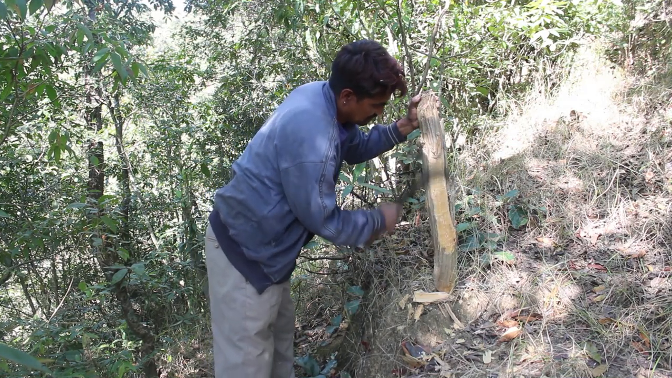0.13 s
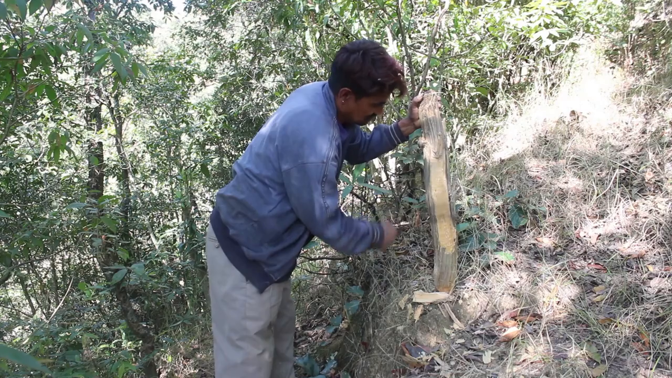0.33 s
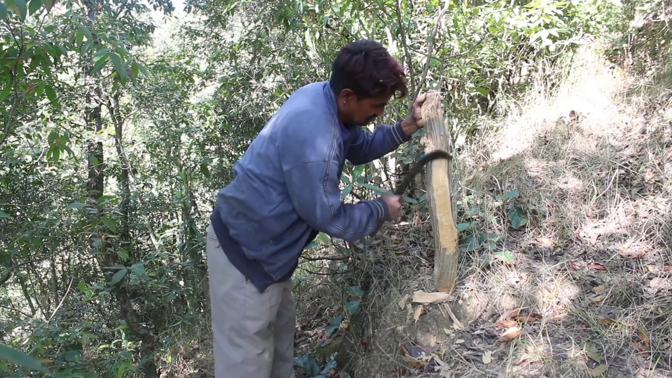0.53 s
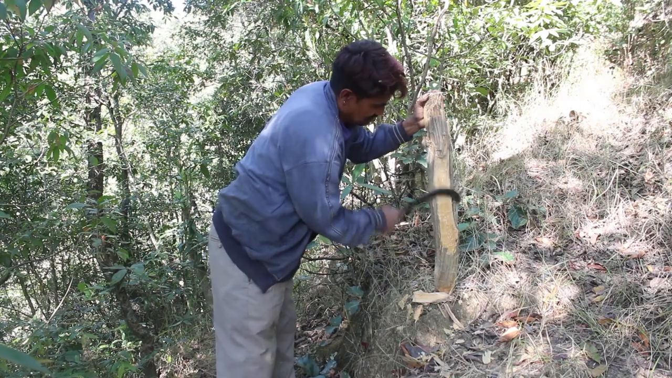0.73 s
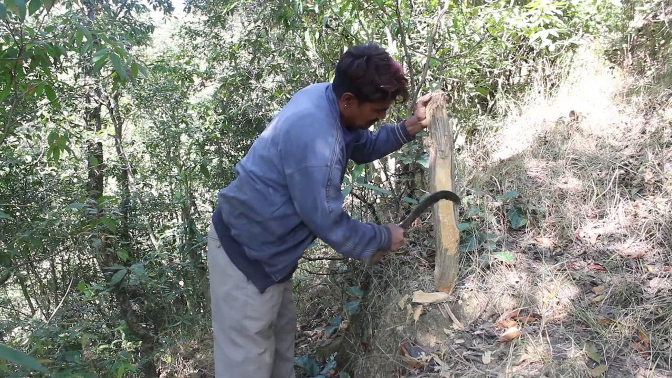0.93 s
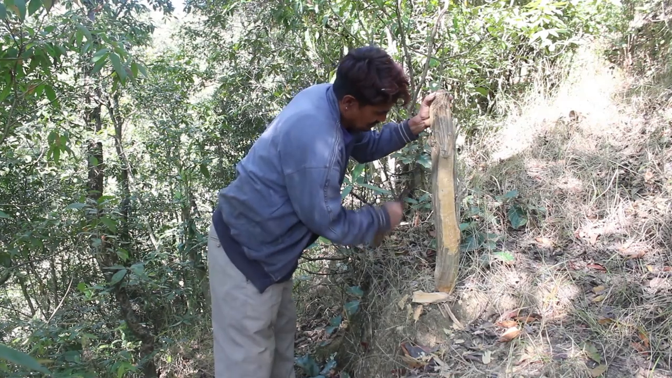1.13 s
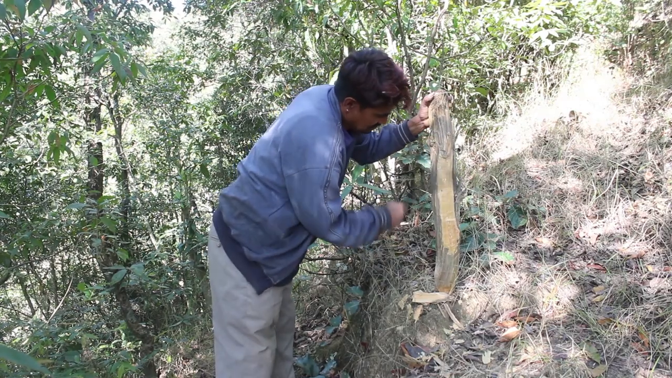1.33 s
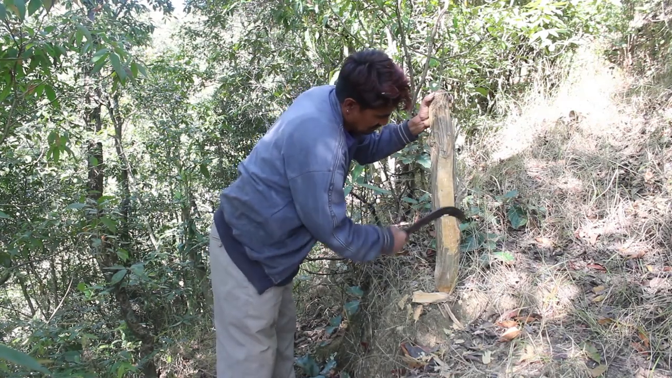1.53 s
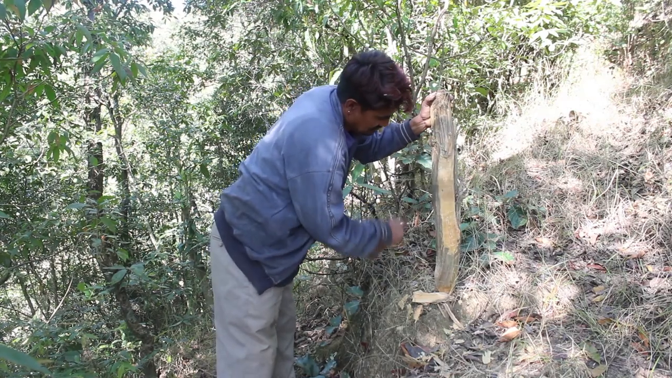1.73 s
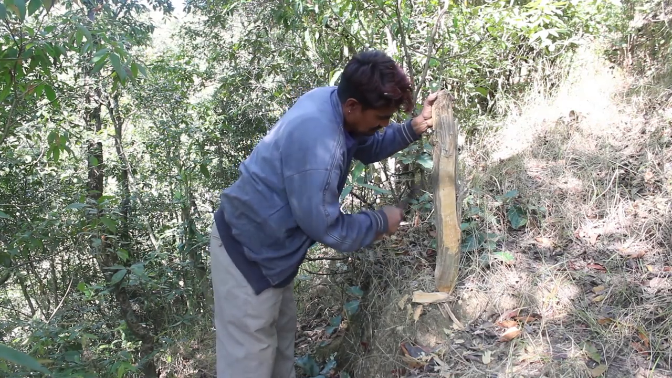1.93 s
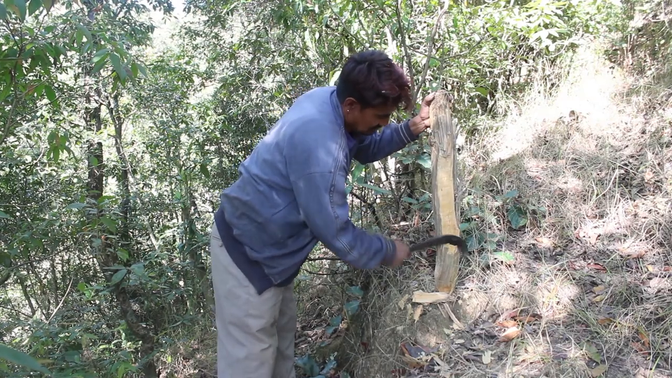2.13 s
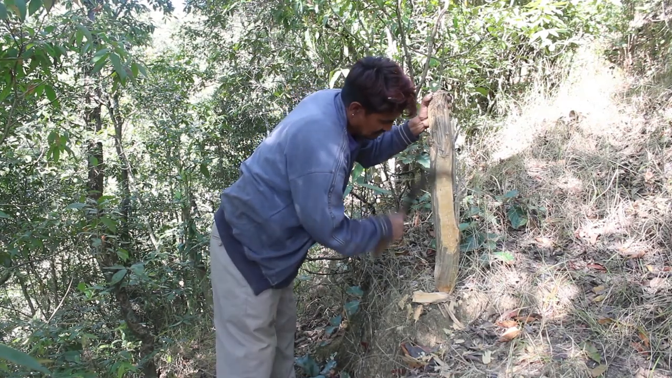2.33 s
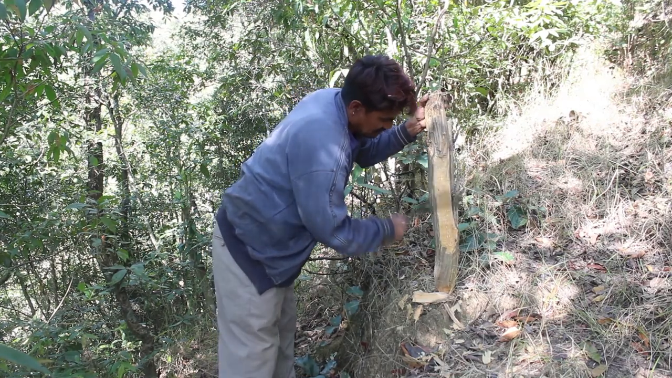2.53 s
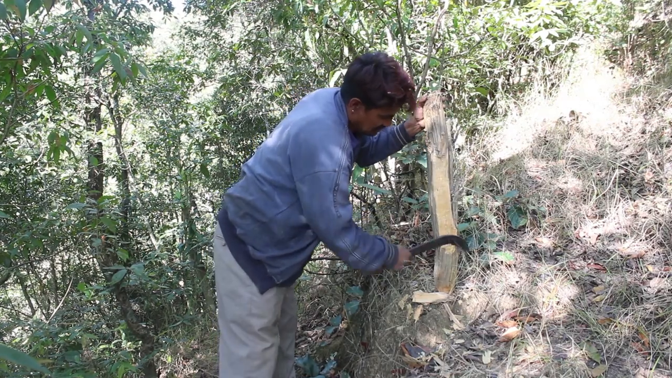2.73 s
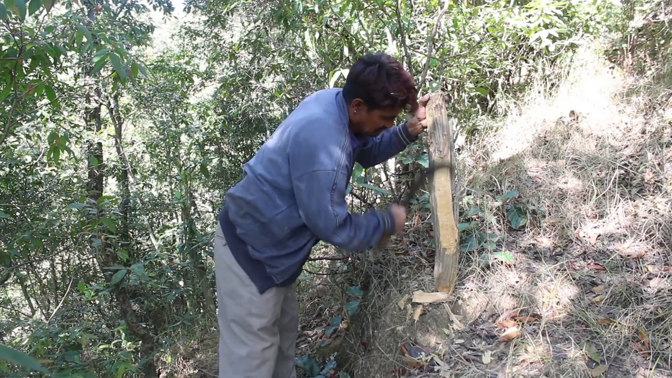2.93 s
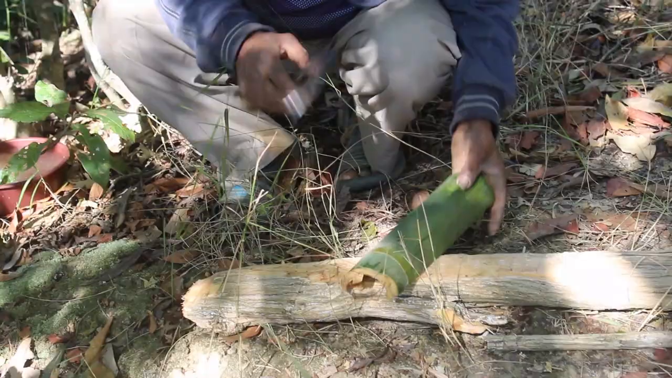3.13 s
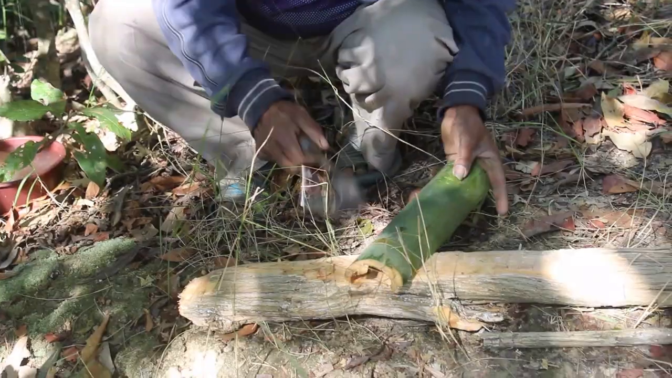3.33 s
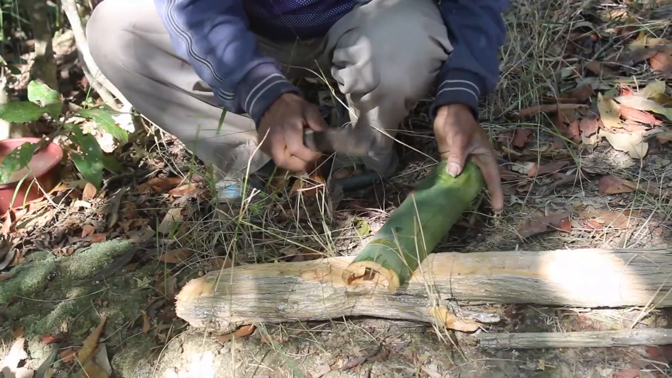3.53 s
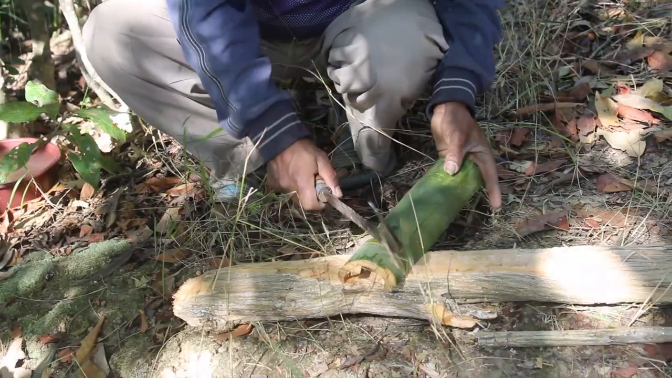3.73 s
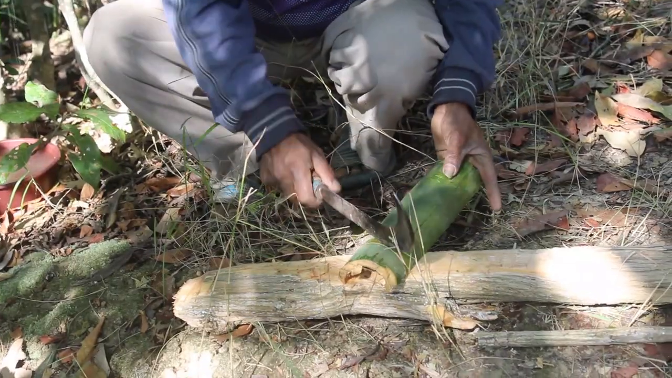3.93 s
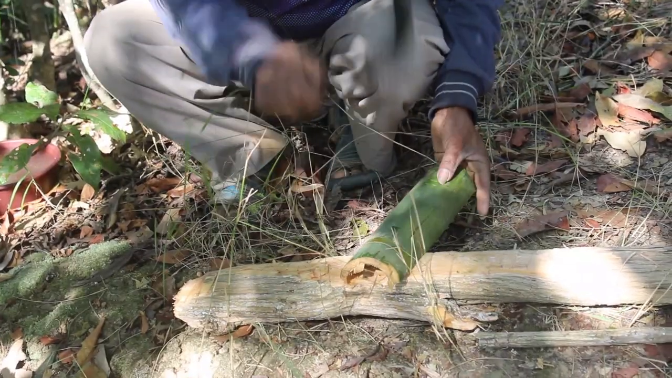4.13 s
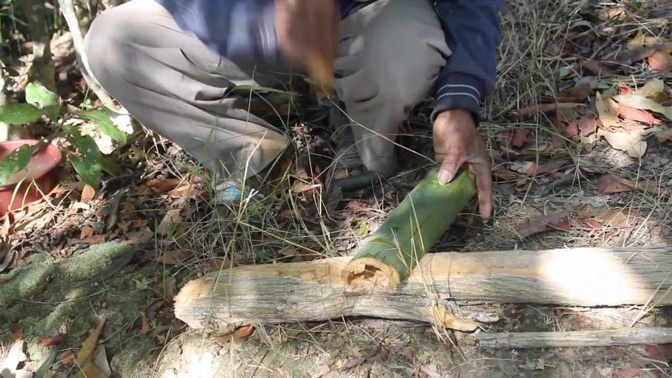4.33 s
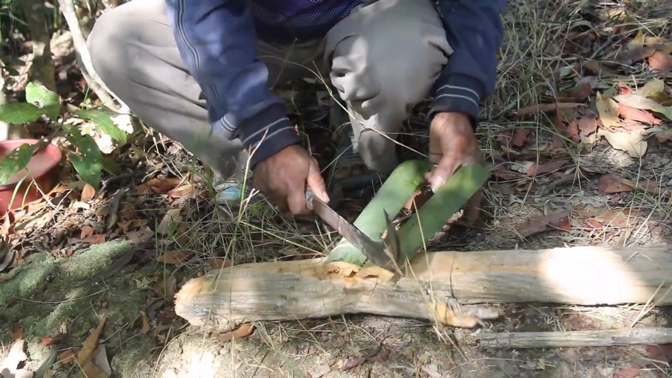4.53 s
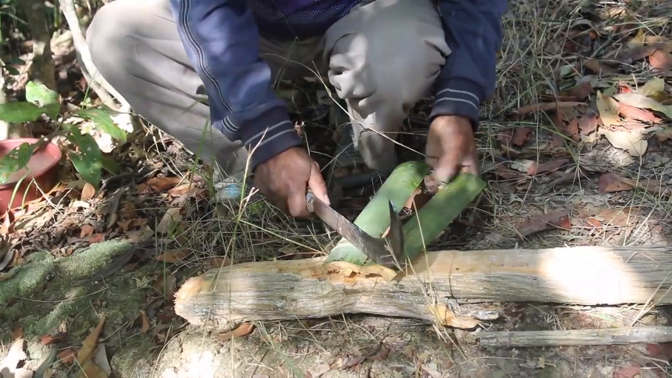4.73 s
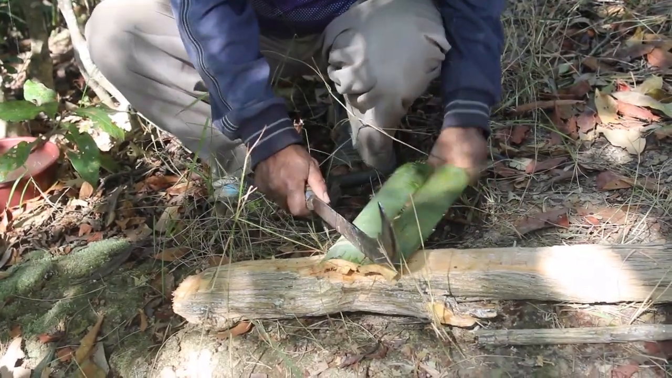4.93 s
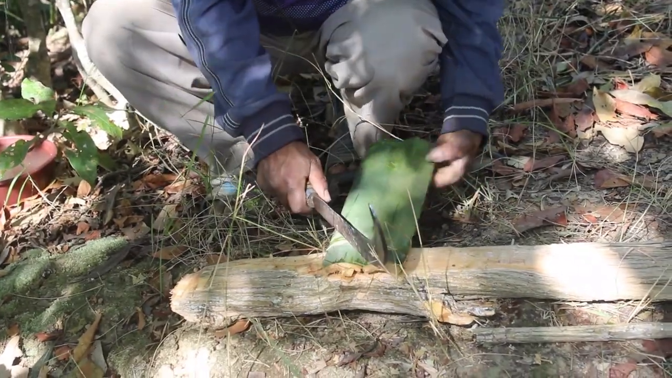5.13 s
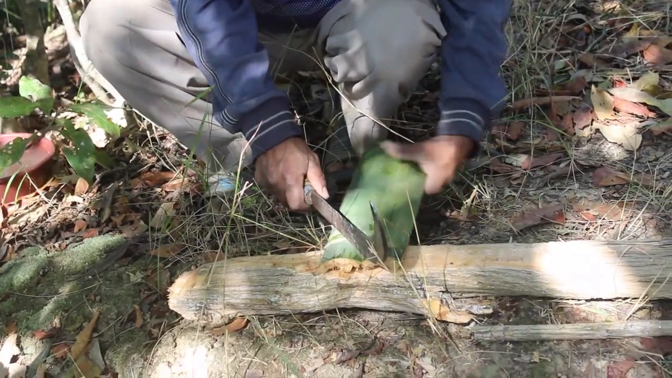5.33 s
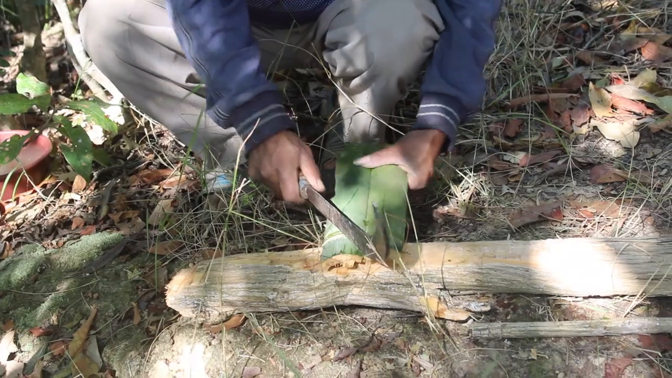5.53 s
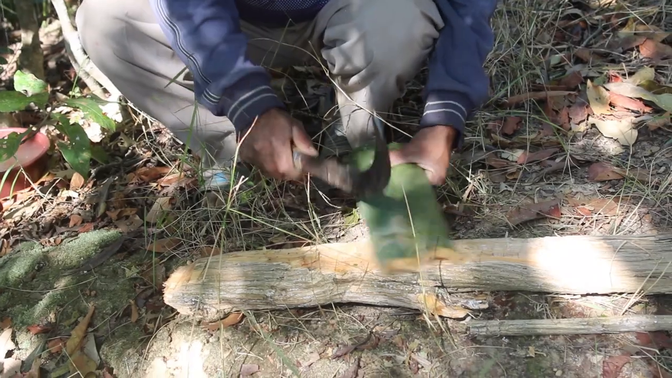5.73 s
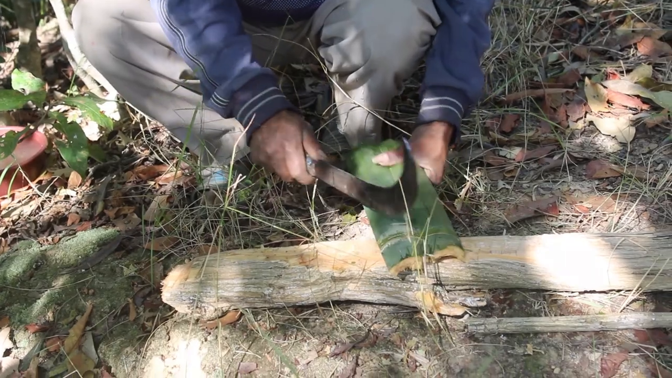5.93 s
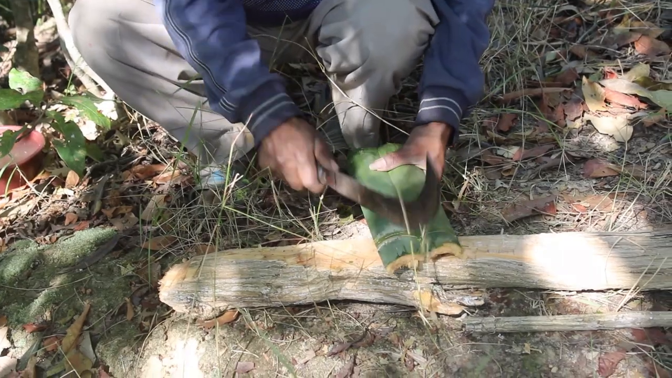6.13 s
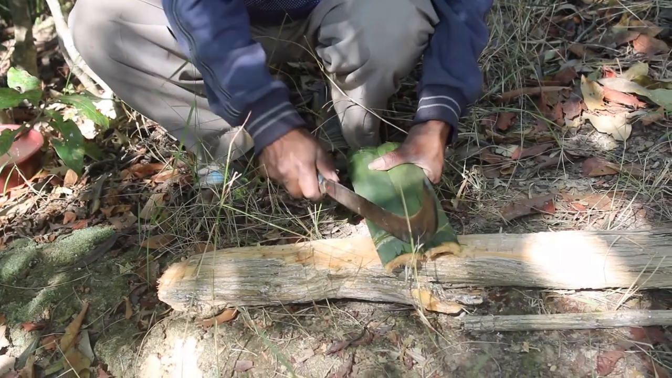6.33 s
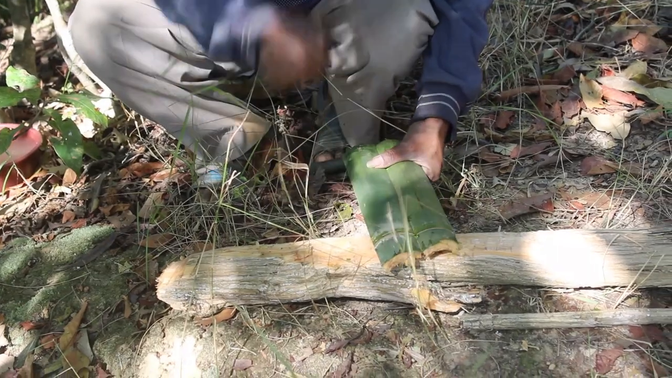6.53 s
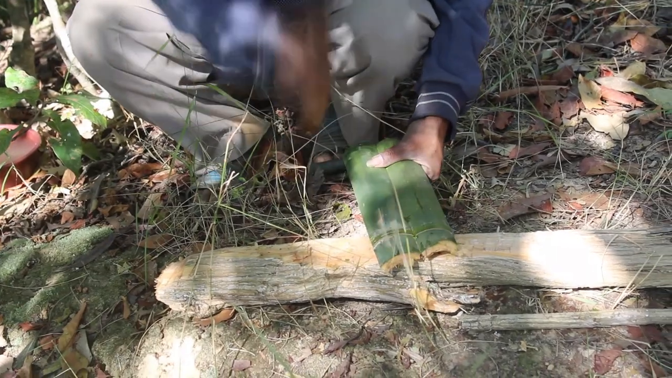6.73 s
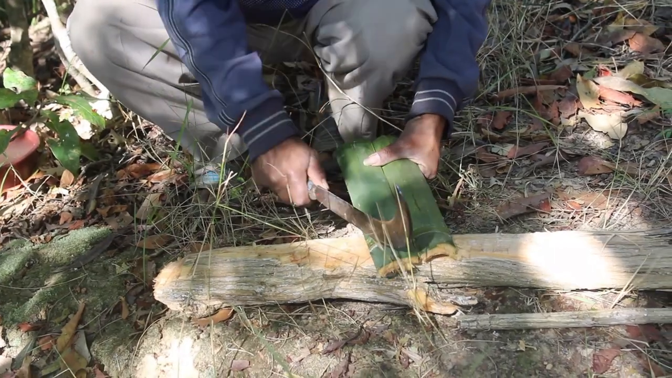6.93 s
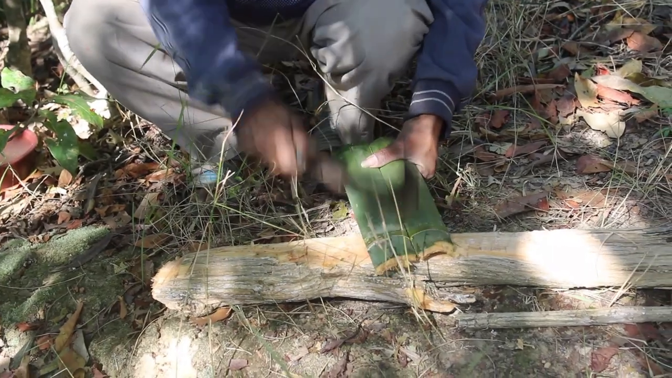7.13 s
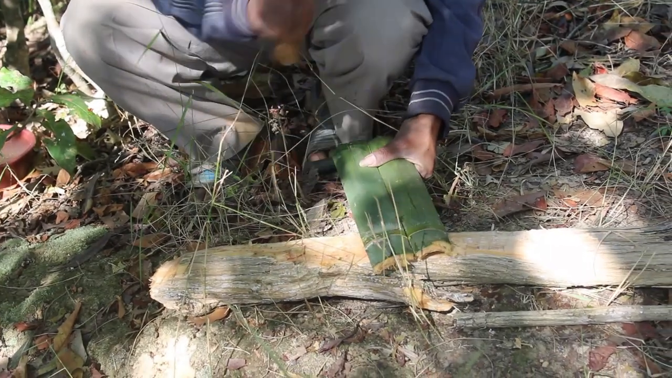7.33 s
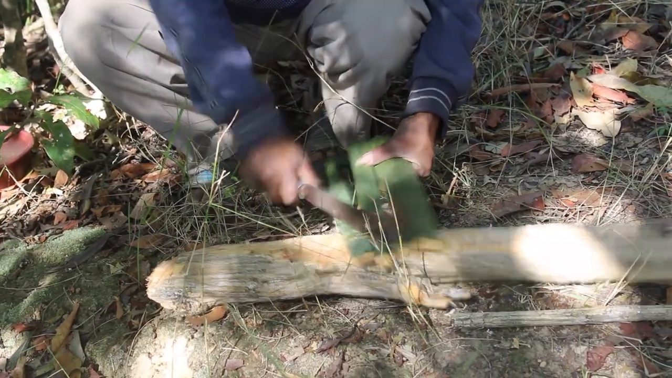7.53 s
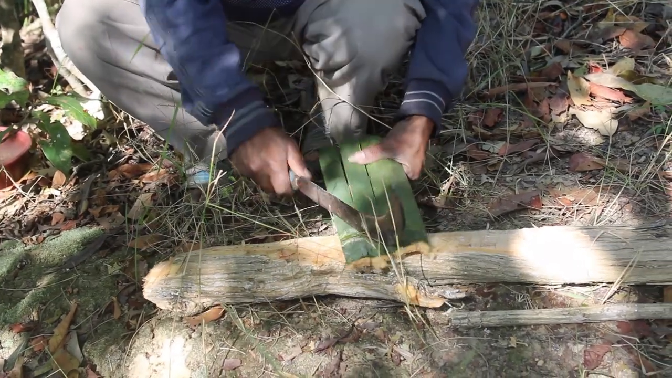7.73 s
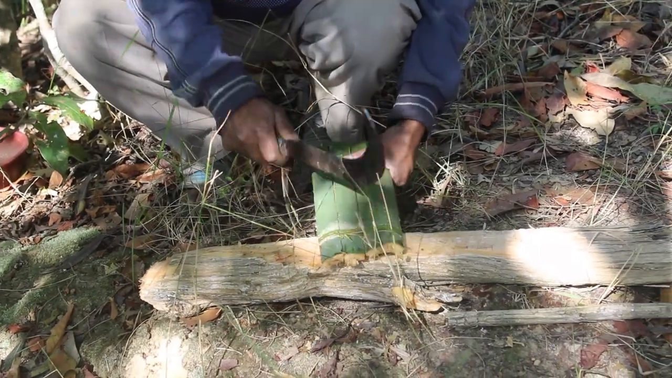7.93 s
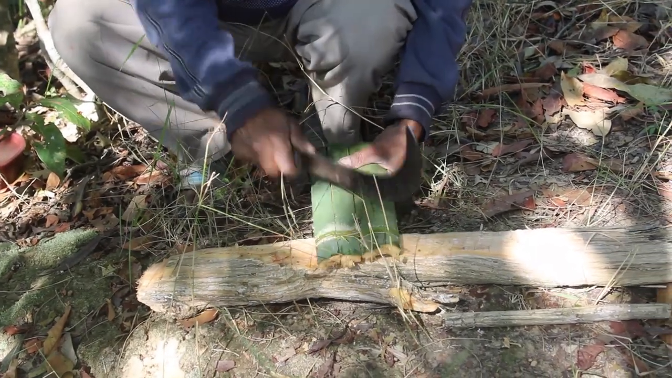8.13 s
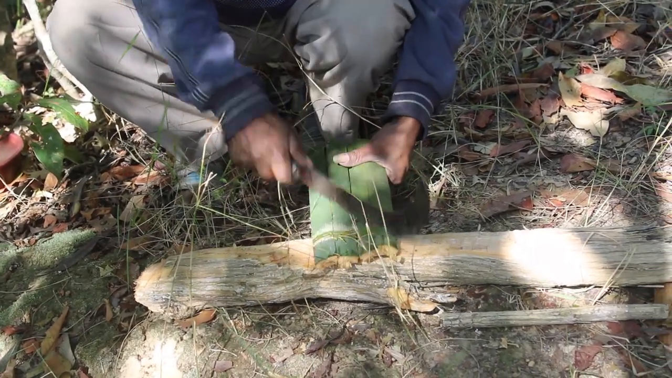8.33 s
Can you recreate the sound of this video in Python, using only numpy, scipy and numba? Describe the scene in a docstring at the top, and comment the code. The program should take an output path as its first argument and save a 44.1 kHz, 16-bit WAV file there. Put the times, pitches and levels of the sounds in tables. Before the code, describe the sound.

Short bright rasps and splintery snaps alternate with fast knocking chatter as a knife scrapes a wooden pole. Then come fewer, much louder blows on green bamboo over a log, sharp and hollow, each followed by a diffuse woodland echo. Small ticks, faint squeaky prying and dry leaf rustle fill the gaps over a low outdoor hush. The single microphone overloads on the hardest chops, then its level recovers.

```python
"""Quick scraping strokes come first: a curved steel knife shaves a standing wooden pole by noisy stick-slip,
and it chatters in rows of resonant knocks as it is drawn back up.
Then hard chops split green bamboo on a log: cracking noise, ringing stem modes, a low thump and steel resonances,
each with a decaying noise echo among the trees. Leaves and clothes rustle in clicks and noise over a forest hush.
The loud chops clip before the gain control ducks; the level then recovers."""
import sys
import numpy as np
from scipy import signal
from scipy.fft import rfft, irfft, next_fast_len
from scipy.io import wavfile
from scipy.ndimage import minimum_filter1d, map_coordinates
from numba import njit

SR = 44100
rng = np.random.default_rng(int(sys.argv[2]) if len(sys.argv) > 2 else 0)


def store_pcm(level_fs):
    """Save levels as 16-bit WAV."""
    pcm = np.round(np.clip(level_fs, -1, 1) * 32767).astype(np.int16)
    wavfile.write(sys.argv[1], SR, np.atleast_2d(pcm).T)


N = 373968

# All table levels are relative: the mix and the filters set the final loudness.
# hush of the forest: (frequency [Hz], gain [dB])
AIR_COLOUR = [(15, -27), (25, -7), (75, -0.5), (224, -1.5), (404, -2.5), (462, -4), (1000, -7),
              (1350, -5.5), (1540, -8.5), (1860, -9.5), (2630, -10), (6900, -24), (15000, -36)]
# thin whistle: (fullest time [s], rise [s], fall [s], level [dB])
WHISTLE_SWELLS = [(6.76, 0.24, .16, -64.5), (7.52, 0.12, .1, -60.5)]
# shifts of the body and lifts of the arm that stir leaves and clothes:
# (fullest time [s], rise [s], fall [s], level [dB])
STIRS = [(.02, .05, .42, -35.5), (.85, .06, .05, -42.5), (1.3, .25, .05, -40), (2.23, .06, .07, -40),
         (2.59, .03, .03, -39), (2.85, 0.024, 0.053, -39.5), (3.27, 0.062, 0.13, -46.5),
         (4.26, 0.16, 0.12, -47), (4.48, 0.092, .05, -37.5), (5.33, .25, .25, -47), (6.05, .25, .2, -53.5),
         (6.57, .06, .08, -47), (6.87, .06, .04, -50), (7.23, 0.067, 0.055, -50), (7.52, .1, .2, -49.5)]
# brightness of the rustle: (frequency [Hz], gain [dB])
LEAF_COLOUR = [(300, -10), (1000, -9), (2000, -7.5), (4000, -1.5), (7500, -1), (9500, -7.5), (12000, -22),
               (15000, -38.5)]
# the sharpest splinters and twigs: (time [s], level [dB])
TICKS = [(3.1724, -19.5), (4.4557, -28), (4.7595, -22.5), (5.2795, -23), (5.524, -26.5), (5.8413, -26),
         (6.5625, -28), (6.8801, -20), (7.4632, -27.5), (8.0177, -37), (8.247, -35)]
# blade rubbing in the split; a row that ends before it starts is silent:
# (start [s], hardest time [s], end [s], level [dB])
RUBS = [(5.243, 5.267, 5.24, -47.5), (5.67, 5.775, 5.83, -47), (5.83, 5.84, 5.89, -37.5)]
# resonances of the squeak: (frequency [Hz], width [Hz], level [dB])
SQUEAK_MODES = [(2840, 70, 1.5), (3850, 84, 5.5), (4270, 150, -2.5), (4960, 130, -6), (6600, 870, -10.5)]
# downward cuts along the pole: (start [s], length [s], hiss level [dB], wood level [dB])
STROKES = [(0.024, 0.04, -22.5, -28), (0.385, 0.023, -23, -33), (0.437, 0.011, -26.5, -30.5),
           (.672, 0.056, -29, -35.5), (0.967, 0.032, -22, -33.5), (1.227, .049, -22.5, -32.5),
           (1.518, 0.052, -22, -31), (1.807, .052, -22.5, -31.5), (2.089, .085, -23.5, -34),
           (2.44, 0.066, -23, -36), (2.737, 0.066, -25.5, -33.5), (3.035, 0.064, -23, -31.5)]
# bouncing blade on its way back up:
# (start [s], length [s], time between bounces [s], steel level [dB], wood level [dB])
RETURNS = [(0.5834, 0.028, .0286, -34, -36), (.842, 0.056, .015, -33.5, -50),
           (1.113, 0.053, 0.015, -30.5, -32.5), (1.4198, 0.035, 0.0097, -28.5, -27),
           (1.6746, 0.078, 0.013, -35.5, -35), (1.983, 0.072, .019, -31.5, -32.5),
           (2.3179, 0.045, .0122, -25, -26), (2.6272, 0.048, 0.019, -27, -26.5),
           (2.9384, 0.051, 0.018, -30.5, -25.5)]
# the edge catches hard and a thick splinter snaps: (time [s], wood level [dB], steel level [dB])
SNAPS = [(.0458, -22.5, -11.5), (.0512, -15, -20.5), (.1084, -24.5, -45), (.3918, -13, -16.5),
         (.4058, -25, -19), (.441, -14.5, -15), (.7209, -36, -17), (.8868, -55, -26),
         (1.1726, -20.5, -24.5), (1.271, -29.5, -16), (1.7402, -26, -25.5), (1.8631, -24.5, -23),
         (2.0211, -25, -25.5), (2.05, -31, -20), (2.1465, -20, -11.5), (2.2315, -55, -19.5),
         (2.3206, -19, -32), (2.6478, -17.5, -39), (2.7763, -35, -18.5), (2.7998, -43, -17),
         (2.8071, -36, -10), (2.8144, -33, -9), (2.9778, -24, -24)]
# resonances of the pole: (frequency [Hz], width [Hz], level [dB])
POLE_MODES = [(95.1, 21, -3), (255, 143, -9), (371, 76, 4), (677, 48, -0.5), (884, 52.5, 2.5),
              (1545, 97, 3), (1990, 160, -8.5)]
# resonances of the blade biting the pole: (frequency [Hz], width [Hz], level [dB])
BLADE_MODES = [(3160, 490, -13.5), (4235, 100, 6), (4590, 500, -3), (6310, 207, 8), (7820, 310, -1),
               (9750, 146, 0)]
# colour of the tearing: (frequency [Hz], gain [dB])
TEARING_COLOUR = [(30, -6), (80, -0.5), (160, 1.5), (300, -2), (800, -1), (1500, -2.5), (2600, 3.5),
                  (4000, 0), (8000, -1), (10000, -8), (11500, -18), (14500, -28.5), (16000, -42.5)]
# blows and taps on the bamboo: (time [s], hollow ring level [dB], crack level [dB], crack centre [Hz],
# log thump level [dB], thump pitch [Hz], steel level [dB], steel pitch [Hz], echo level [dB])
CHOPS = [(3.476, -37.5, -39.5, 1960, -50, 185, -62, 2200, -66.5),
         (3.8017, 6.5, 12, 2350, 0.5, 225, -19.5, 2900, -11),
         (4.5261, 13.5, 18, 3150, 4, 175, -17, 3000, -2), (5.053, -30, -46, 248, -56, 185, -79, 1500, -61),
         (5.424, -20.5, -31.5, 740, -47.5, 185, -44.5, 1880, -50),
         (6.282, -5, -13, 2750, -23.5, 215, -34.5, 1960, -37),
         (6.8916, 9, 15, 3700, 7.5, 225, -8, 3230, -4.5), (7.617, 5, 19, 4615, 3.5, 190, -13, 1542, -7.5),
         (8.287, -5, 8, 2380, -10, 170, -14, 2230, -20.5)]
# nominal modes of the bamboo stem: (frequency [Hz], level [dB], 60 dB decay time [s])
BAMBOO_MODES = [(412, -14, 0.036), (536, -12, 0.031), (980, 0, 0.019), (1096, -9.5, 0.039),
                (1464, -3, 0.011), (1855, -6, 0.044), (2900, -12, 0.036), (3908, -6, 0.038),
                (4904, -10, 0.024)]
# knife ringing on after a blow: (frequency [Hz], width [Hz], level [dB])
STEEL_MODES = [(1530, 23, -1), (1947, 41, -5.5), (2160, 59, -3), (2900, 130, -2), (3170, 82, 0.5),
               (3980, 65, -4.5), (4360, 99, -4), (5900, 110, -10.5)]
# colour of splitting fibres: (frequency [Hz], gain [dB])
CRACK_COLOUR = [(100, -22), (500, 1), (1200, -1), (4000, -0.5), (7500, -3.5), (9500, -12.5), (12000, -23),
                (16000, -32.5)]
# shudder of log and soil: (frequency [Hz], gain [dB])
GROUND_COLOUR = [(30, -18.5), (80, -5), (190, 4), (270, -5), (420, -28), (1500, -59.5)]
# colour of the echo: (frequency [Hz], gain [dB])
ECHO_COLOUR = [(50, -3.5), (180, 1), (550, -6), (1200, 4), (3200, -1.5), (7000, -1.5), (10000, -5),
               (15000, -13)]
# decay of the far trees' echo: (frequency [Hz], 60 dB decay time [s])
FAR_DECAY = [(150, .4), (500, 0.13), (1300, 0.32), (3200, .42), (7000, .36), (12000, 0.3)]

MOVE_S = 3.15  # the work moves from the pole to the log
POLE_HUSH_DB, LOG_HUSH_DB = -49, -53  # level of the forest at each place
POLE_RUSTLE_DB, LOG_RUSTLE_DB = -47, -54.5  # steady stirring while standing and while crouching
TWIG_DB, TWIG_SCATTER_DB = 11.5, 5  # lesser ticks, against the rustle that sets them off
BITE_S, RELEASE_DB_PER_S, SLIDE_DB_PER_S = 0.014, 600, 77  # the edge bites, lets go, slides on lightly
FIBRE_DB, FIBRE_SCATTER_DB = -2.5, 3.5  # small snaps within a cut, against its level
BOUNCE_JITTER_S = .0005  # unevenness of the bounces
RUB_HISS_DB, RUB_WOOD_DB = -11, -7  # rubbing between bounces, against their levels
LOW_CUT_HZ, TOP_HZ = 70, 16100  # the microphone's bass roll-off; steep treble limit


def amp(db):
    """Decibels to gain."""
    return 10 ** (np.asarray(db) / 20)


def unit(x):
    """x at rms 1."""
    return x / np.sqrt(np.mean(np.abs(x) ** 2) + 1e-20)


def along(points, hz):
    """Read (frequency [Hz], value) points on a log axis."""
    f, v = np.transpose(points)
    return np.interp(np.log(hz + 1), np.log(f), v)


def curve(rows):
    """Draw (time [s], value) points as one value per sample."""
    return np.interp(np.arange(N) / SR, *np.transpose(rows))


def wobble(rate):
    """A smooth random curve, rate knots a second."""
    knots = rng.standard_normal(int(N * rate / SR) + 4)
    return map_coordinates(knots, [np.arange(N) * rate / SR])


def filtered(x, response):
    """x times a response of frequency."""
    size = next_fast_len(len(x) + 4096)
    spectrum = rfft(x, size) * response(np.fft.rfftfreq(size, 1 / SR))
    return irfft(spectrum, size)[:len(x)]


def coloured(x, gain_db):
    """x through the causal filter that has the given dB response of frequency."""
    cepstrum = irfft(np.log(amp(gain_db(np.fft.rfftfreq(2048, 1 / SR)))))
    half = len(cepstrum) // 2
    # folding the cepstrum forward in time gives minimum phase, so attacks stay sharp
    folded = np.r_[cepstrum[0], 2 * cepstrum[1:half], np.zeros(half)]
    impulse = irfft(np.exp(rfft(folded)))
    return signal.fftconvolve(x, impulse)[:len(x)]


def resonate(x, modes):
    """x through (frequency [Hz], width [Hz], level [dB]) resonances, keeping the power of white noise."""
    def response(f):
        total = 0
        for k, (hz, width, db) in enumerate(modes):
            damping = 1j * f * width
            total = total + (-1) ** k * amp(db) * damping / (hz * hz - f * f + damping)
        return unit(total)
    return filtered(x, response)


def add(track, s, sound):
    """Mix a sound into the track at time s."""
    part = track[max(round(s * SR), 0):][:len(sound)]
    part += sound[:len(part)]


def burst(t60):
    """A short dying puff of noise that starts at rms 1."""
    t = np.arange(SR // 8) / SR
    return rng.standard_normal(len(t)) * amp(-60 * t / t60)


def swells(rows):
    """Power sum of smooth rises and falls, as a gain."""
    t = np.arange(N) / SR
    power = np.zeros(N)
    for s, rise, fall, db in rows:
        bell = np.exp(-((t - s) / np.where(t < s, rise, fall)) ** 2)
        power += (amp(db) * bell) ** 2
    return np.sqrt(power)


def by_place(pole_db, log_db):
    """A gain that glides within 0.1 s from its value at the pole to its value at the log."""
    return amp(curve([(MOVE_S, pole_db), (MOVE_S + .1, log_db)]))


def ambience():
    """The forest's hush is slowly wavering noise; a thin unsteady sine whistle comes and goes."""
    breeze = amp(.5 * wobble(4))
    hush = breeze * unit(filtered(rng.standard_normal(N), lambda hz: amp(along(AIR_COLOUR, hz))))
    whistle_hz = 1900 + 8 * wobble(45)
    whistle = unit(np.sin(2 * np.pi * np.cumsum(whistle_hz) / SR))
    return by_place(POLE_HUSH_DB, LOG_HUSH_DB) * hush + swells(WHISTLE_SWELLS) * whistle


def crinkle(rate, pitch_hz, spread_db):
    """Dry leaves flex in tiny clicks, each a dying sine with its own pitch. Rms 1."""
    at, pitch, size = rng.random((int(rate * N / SR), 3)).T[..., None]
    t = np.arange(200) / SR
    hz = pitch_hz * 2 ** (2.2 * (np.sqrt(pitch) - .5))
    loudness = amp(-spread_db * np.log(.03 + size))
    clicks = loudness * np.sin(2 * np.pi * hz * t) * np.exp(-hz * t / 2.5)
    places = (at * N + t * SR).astype(int)
    return unit(np.bincount(places.ravel(), clicks.ravel(), N)[:N])


def twigs(movement, count):
    """Lesser ticks, likelier and louder the more the leaves are stirred: (time [s], level [dB])."""
    odds = np.cumsum(np.sqrt(movement))
    at = np.searchsorted(odds, odds[-1] * rng.random(count))
    scatter_db = TWIG_SCATTER_DB * rng.standard_normal(count)
    return zip(at / SR, 20 * np.log10(movement[at]) + TWIG_DB + scatter_db)


def litter():
    """Movement rubs dry leaves and cloth into clicks and noise; now and then a splinter or twig ticks."""
    movement = np.hypot(swells(STIRS), by_place(POLE_RUSTLE_DB, LOG_RUSTLE_DB))
    clicks = crinkle(rate=450, pitch_hz=5200, spread_db=6) * amp(1.5 * wobble(25))
    rustle = movement * (.5 * clicks + .75 * rng.standard_normal(N))
    for s, db in [*TICKS, *twigs(movement, count=95)]:
        add(rustle, s, amp(db - 3.5) * burst(t60=0.016))
    return coloured(rustle, lambda hz: along(LEAF_COLOUR, hz))


def crackle(rate, spread_db, smooth):
    """Tiny fractures of uneven size over a smooth hiss, rms 1."""
    size = np.minimum(rng.exponential(size=N), 3)
    happens = rng.random(N) < rate / SR
    grains = happens * rng.choice([-1, 1], N) * amp(spread_db * size)
    return unit(unit(grains) + smooth * rng.standard_normal(N))


def pressure(start, hardest, end, edge_db):
    """Force of one rub: it swells to its hardest point and lets go."""
    t = start + np.arange(max(int((end - start) * SR), 2)) / SR
    swell_db = np.interp(t, [start, hardest, end], [edge_db, 0, edge_db])
    return amp(swell_db) * signal.windows.tukey(len(t), .1)


def prying():
    """The wedged blade squeaks against the wet walls of the split: crackle through resonances."""
    force = np.zeros(N)
    for start, hardest, end, db in RUBS:
        add(force, start, amp(db) * pressure(start, hardest, end, edge_db=-14.5))
    return resonate(force * crackle(rate=1100, spread_db=6.5, smooth=1.0), SQUEAK_MODES)


def stick_slip(rate):
    """Strength of the tearing: the edge sticks, then slips, at an uneven rate. Rms 1."""
    draws = rng.standard_normal((3000, 2))
    at = np.cumsum(np.exp(.45 * draws[:, 0]) * SR / rate).astype(int)
    slips = np.bincount(at, amp(2 * draws[:, 1]), N)[:N]
    t = np.arange(SR // 20) / SR
    slip_shape = np.exp(-t / .002) * (1 - np.exp(-t / .0004))
    return unit(signal.fftconvolve(slips, slip_shape)[:N])


def grip(length, swell_db, slide_db):
    """Force of the edge on the pole: it bites, builds through the stroke, lets go and slides on."""
    t = np.arange(SR // 3) / SR
    after = np.maximum(t - length, 0)
    hold = np.minimum(t / BITE_S, 1) * amp(swell_db * np.minimum(t / length - 1, 0))
    return hold * (amp(-RELEASE_DB_PER_S * after) + amp(slide_db - SLIDE_DB_PER_S * after))


def elsewhere(modes, detune, scatter_db):
    """Each new point of contact shifts the modes and shares the blow among them differently."""
    draws = rng.standard_normal((len(modes), 2))
    return [(hz * np.exp(detune * a), width, db + scatter_db * b)
            for (hz, width, db), (a, b) in zip(modes, draws)]


def fibres(count, swell_db):
    """Small snaps at chance moments of each cut, their steel growing with depth: (time, wood, steel)."""
    for start, length, hiss_db, wood_db in STROKES:
        shares = (np.arange(count) + rng.random(count)) / count
        levels = FIBRE_DB + FIBRE_SCATTER_DB * rng.standard_normal((count, 2))
        for share, (a, b) in zip(shares, levels):
            yield start + share * length, wood_db + a, hiss_db + b - swell_db * (1 - share)


def bounces(count, scatter_db, soft_start_db, lift_db_per_s):
    """Chatter of each return, more and more woody until the blade lifts off: (time, wood, steel)."""
    for start, length, gap, steel_db, wood_db in RETURNS:
        for k, (late, a, b) in enumerate(rng.standard_normal((count, 3))):
            t = k * gap
            lifted = lift_db_per_s * max(t - length, 0)
            grazing = soft_start_db * max(1 - 2 * t / length, 0)
            wood = wood_db - lifted - grazing + scatter_db * a
            steel = steel_db - lifted + scatter_db * b
            yield start + t + BOUNCE_JITTER_S * late, wood, steel


def bitten_blade(x):
    """Steel rasp: blade resonances with some of the raw hiss."""
    return resonate(x, BLADE_MODES) + amp(-3.5) * x


def snap(wood_db, steel_db):
    """One snap shakes the pole and the blade, each a noise puff through its own resonances."""
    knock = resonate(burst(t60=.005), elsewhere(POLE_MODES, detune=.05, scatter_db=3.5))
    puff = burst(t60=.013)
    bite = resonate(puff, elsewhere(BLADE_MODES, detune=.008, scatter_db=3)) + amp(-3.5) * puff
    return amp(wood_db + 10.0) * knock + amp(steel_db + 2.5) * bite


def shaving():
    """The edge tears fibres; each tear shakes both the pole and the blade."""
    hiss, push, snaps = np.zeros((3, N))
    for start, length, hiss_db, wood_db in STROKES:
        add(hiss, start, amp(hiss_db) * grip(length, swell_db=9, slide_db=-20))
        add(push, start, amp(wood_db) * grip(length, swell_db=-1, slide_db=-31))
    for start, length, _, steel_db, wood_db in RETURNS:
        add(hiss, start, amp(steel_db + RUB_HISS_DB) * grip(length, swell_db=11.0, slide_db=-12))
        add(push, start, amp(wood_db + RUB_WOOD_DB) * grip(length, swell_db=11, slide_db=-25))
    chatter = bounces(count=6, scatter_db=3.0, soft_start_db=3.5, lift_db_per_s=1299)
    for s, wood_db, steel_db in [*SNAPS, *fibres(count=4, swell_db=5), *chatter]:
        add(snaps, s, snap(wood_db, steel_db))
    wood, steel = stick_slip(rate=210) * rng.standard_normal((2, N))
    rasp = resonate(push * wood, POLE_MODES) + amp(-4) * bitten_blade(hiss * steel)
    return coloured(snaps + rasp, lambda hz: along(TEARING_COLOUR, hz))


def forest(colour_db, far_db):
    """Ground and near stems scatter a dense short echo; farther trees a long faint one."""
    noise = rng.standard_normal(SR // 2)
    scatter = unit(coloured(noise, lambda hz: colour_db(hz) + along(ECHO_COLOUR, hz)))
    hz, t, z = signal.stft(scatter, SR, nperseg=256)
    near = amp(-60 * t / 0.094)
    far = amp(far_db - 60 * t / along(FAR_DECAY, hz)[:, None])
    tail = signal.istft(z * (near + far), SR, nperseg=256)[1][:len(scatter)]
    fade_in = np.clip(np.arange(len(tail)) / SR / 0.0022, 0, 1) ** 2
    return tail * fade_in


def crack_colour(hz, centre_hz, lift_db):
    """Gain in dB of splitting fibres, lifted around one pitch."""
    octaves = np.log2(hz / centre_hz + 1e-6)
    return along(CRACK_COLOUR, hz) + lift_db * np.exp(-octaves ** 2 / 0.56)


def struck_at(modes, hz, lift_db):
    """The point of contact favours the modes near one pitch."""
    return [(f, width, db + lift_db * np.exp(-np.log2(f / hz) ** 2 / .02)) for f, width, db in modes]


def hollow_ring(t, crack_hz):
    """The hollow stem rings in slightly detuned dying sines."""
    ring = np.zeros(len(t))
    for hz, db, t60 in BAMBOO_MODES:
        reach = 1 / np.sqrt(1 + (hz / (2.8 * crack_hz)) ** 4)  # a soft contact leaves the high modes still
        level = reach * amp(db + rng.normal(0, 1) - 60 * t / t60)
        mode_hz = hz * (1 + rng.normal(0, 0.0073))
        ring += level * np.sin(2 * np.pi * mode_hz * t + rng.uniform(0, 2 * np.pi))
    return ring


def chop(ring_db, crack_db, crack_hz, thump_db, thump_hz, steel_db, steel_hz):
    """One blow: the fibres crack, the hollow stem rings, the log shudders and the steel sings on."""
    t = np.arange(SR // 2) / SR
    crack_noise, ground_noise, steel_noise = rng.standard_normal((3, len(t)))
    ring = hollow_ring(t, crack_hz)
    crack = unit(coloured(crack_noise, lambda hz: crack_colour(hz, crack_hz, lift_db=10.5)))
    crack *= amp(-60 * t / 0.024)
    thump = np.sin(2 * np.pi * thump_hz * t) * amp(-60 * t / 0.027)
    shudder = unit(coloured(ground_noise, lambda hz: along(GROUND_COLOUR, hz)))
    shudder *= amp(-20.5 - 60 * t / 0.14)
    strike = coloured(steel_noise, lambda hz: along(CRACK_COLOUR, hz))
    steel = resonate(strike, struck_at(STEEL_MODES, steel_hz, lift_db=6.0)) * amp(-4 - 60 * t / 0.24)
    entry = 1 - np.exp(-t / 0.00059)  # the edge takes a moment to sink in
    bamboo = amp(ring_db) * ring + amp(crack_db) * crack
    return entry * (bamboo + amp(thump_db) * (thump + shudder) + amp(steel_db) * steel)


def chopping():
    """Every blow with its own diffuse echo, coloured by its crack."""
    track = np.zeros(N)
    for s, ring_db, crack_db, crack_hz, thump_db, thump_hz, steel_db, steel_hz, echo_db in CHOPS:
        echo = forest(lambda hz: crack_colour(hz, crack_hz, lift_db=5), far_db=-27.5)
        blow = chop(ring_db, crack_db, crack_hz, thump_db, thump_hz, steel_db, steel_hz)
        add(track, s, blow + amp(echo_db + 9.5) * echo)
    return track


def scene():
    """All sources at one microphone."""
    pole = shaving()
    pole_echo = signal.fftconvolve(pole, forest(np.zeros_like, far_db=-17.0))[:N]
    mix = ambience() + litter() + prying() + pole + amp(-45.0) * pole_echo + chopping()
    return mix[None]


@njit
def follow(excess, attack, release):
    """Gain reduction that rises quickly towards the excess level and falls back slowly."""
    cut = np.zeros(len(excess))
    for i in range(1, len(excess)):
        samples = attack if excess[i] > cut[i - 1] else release
        cut[i] = cut[i - 1] + (excess[i] - cut[i - 1]) / samples
    return cut


def record(dry):
    """The gain control ducks too late for a loud chop, so its first milliseconds clip."""
    peak = -minimum_filter1d(-np.abs(dry[0]), size=64)
    excess_db = np.maximum(20 * np.log10(peak + 1e-9) + 3, 0)  # above -3 dB of full scale
    cut_db = follow(excess_db, 0.0048 * SR, .17 * SR)
    late_cut_db = np.interp(np.arange(N) - .0022 * SR, np.arange(N), cut_db)
    clipped = np.clip(dry[0] * amp(-late_cut_db), -1, 1)

    def microphone(hz):
        return 1j * hz / (LOW_CUT_HZ + 1j * hz) / (1 + (hz / TOP_HZ) ** 80)
    return filtered(clipped, microphone)[None]


dry = scene()
out = record(dry)
store_pcm(out)
```